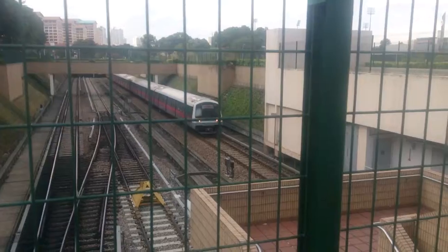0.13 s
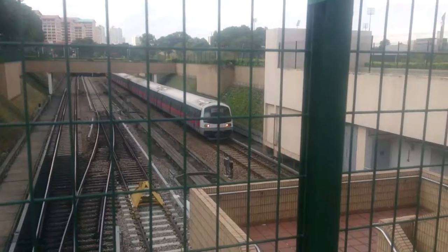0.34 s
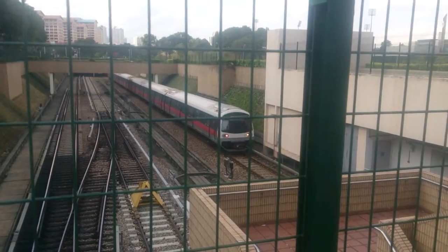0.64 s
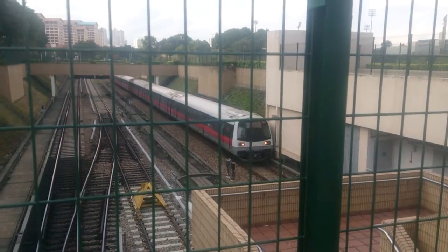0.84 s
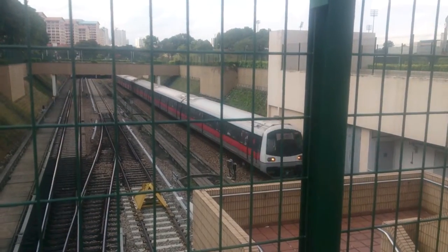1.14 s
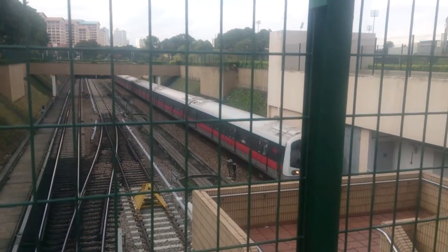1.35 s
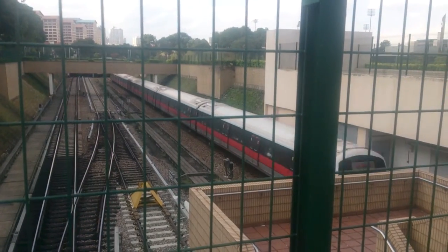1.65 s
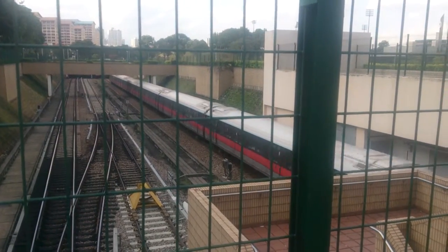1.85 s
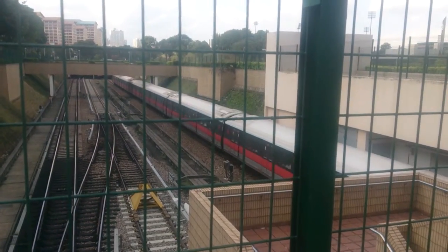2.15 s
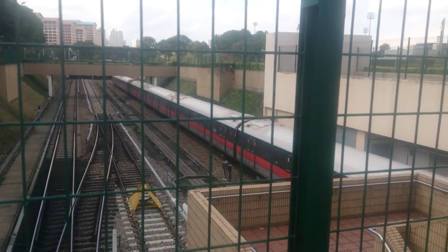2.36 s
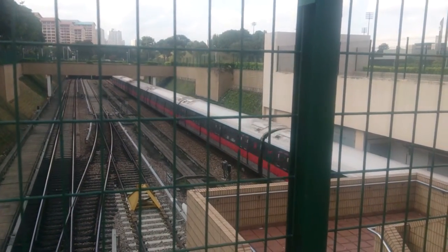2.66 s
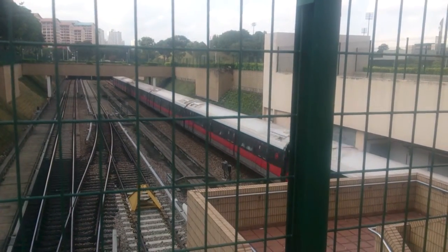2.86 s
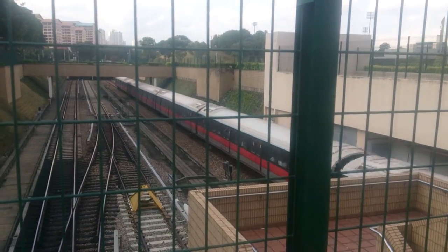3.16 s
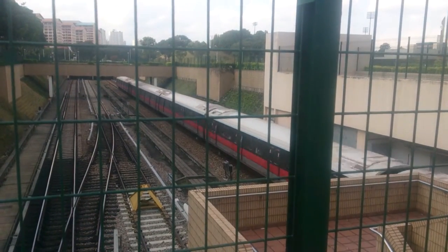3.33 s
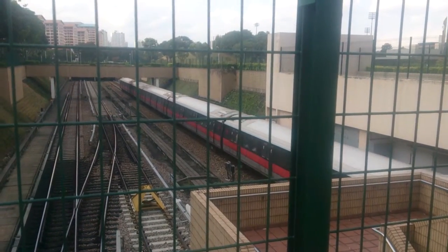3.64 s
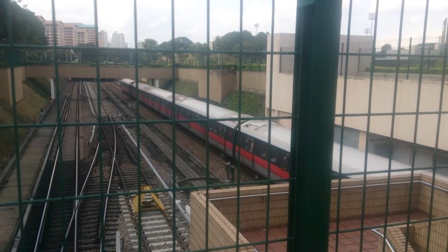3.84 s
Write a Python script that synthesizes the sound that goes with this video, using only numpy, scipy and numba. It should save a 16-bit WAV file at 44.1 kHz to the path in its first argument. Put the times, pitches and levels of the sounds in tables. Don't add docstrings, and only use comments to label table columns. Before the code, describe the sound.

A metro train passes below outdoors. Silence until 0.38 s, then abruptly a full rolling roar, most open around 1 s and slightly duller after 1.55 s. A blurred rail drone sinks and narrows; motor whine is very faint. Axle thumps and deep booms cluster at 0.5-1.55, 1.9-2.9 and 3.4-3.9 s. Faint air hiss peaks near 1.55 s; soft clanks at 2.4, 2.6, 3.5, 3.8. Phone stereo, right brighter; roar continues to the end.

```python
import sys
import numpy as np
from scipy import signal
from scipy.fft import rfft, irfft
from scipy.io import wavfile
from scipy.ndimage import uniform_filter1d
from numba import njit

SR = 44100
rng = np.random.default_rng(int(sys.argv[2]) if len(sys.argv) > 2 else 0)


def ratio(d):
    e = np.asarray(d, float) / 20
    return 10 ** e


def persist_wave(psi):
    counts = np.round(np.clip(psi, -1, 1) * 32767).astype(np.int16)
    wavfile.write(sys.argv[1], SR, np.atleast_2d(counts).T)


N = 176400

# t/s, level/dB
EXPOSURE = [
    (0.39, -46.5),
    (0.95, -45.5),
    (0.96, -44.5),
    (1.52, -45),
    (1.56, -48.5),
    (3.41, -51),
    (3.49, -51),
    (3.51, -51),
    (4.0, -51.5),
]
# f/Hz, share/1
EXPOSURE_SHARE = [(30, 0.46), (70, 1.2), (150, 0.2), (600, 1.02), (2000, 1.43), (5000, 1.12), (12000, 0.33)]
# f/Hz, density/dB per Hz
ROAR_SPECTRUM = [(12, -28), (20, 5), (317, -14), (687, -7.5), (1100, -10), (2130, -15), (5460, -34.5),
                 (7200, -39.5), (14800, -52)]
# f/Hz, width/Hz, level/dB, extra at the left port/dB
WHEEL_RESONANCES = [
    (68, 12, -55, 8.5),
    (528, 225, -50.5, -8),
    (841, 176, -51, 4.5),
    (1910, 790, -51, -10),
    (4390, 630, -60.5, -10),
]
# t/s, f/Hz, level/dB, blur/Hz
RAIL_SONG = [(.38, 781, -50.5, 119.6), (1.0, 769, -40.5, 118), (1.6, 770, -52, 109.3), (2.0, 692, -44, 86),
             (2.45, 706, -46, 78.7), (2.9, 711, -44, 68.3), (3.2, 670, -41, 57.4), (3.6, 659, -45, 58.7),
             (4.0, 654.5, -44, 53.7)]
# t/s, level/dB
BRAKE_AIR = [
    (.39, -60.5),
    (1.35, -61),
    (1.55, -55.5),
    (1.9, -58.5),
    (2.3, -64),
    (3.0, -65),
    (4.0, -69),
]
# t/s, peak level/dB, thud f/Hz
JOINT_BLOWS = [(0.516, -42.5, 271), (0.64, -49, 104), (0.776, -42.5, 124), (0.871, -41, 120),
               (0.956, -35, 142), (0.999, -40.5, 228), (1.111, -36, 114), (1.168, -37, 255),
               (1.243, -37.5, 110.5), (1.401, -35.5, 136), (1.462, -40, 105), (1.54, -50, 102),
               (1.937, -37, 190), (2.099, -35.5, 99), (2.267, -36.5, 107), (2.335, -51, 104.4),
               (2.398, -36, 194), (2.547, -37.5, 228), (2.65, -40.5, 132), (2.853, -39, 137),
               (3.199, -43, 102), (3.439, -34, 184), (3.592, -36, 99), (3.647, -40.5, 130),
               (3.777, -38.5, 101), (3.917, -35.5, 115.4)]
# f/Hz, width/Hz, level/dB, t60/s
JOINT_BODY = [
    (185, 202, -8.5, 0.26),
    (430, 220, -6, 0.37),
    (783, 270, -9.5, 0.27),
    (2570, 1900, -20, 0.63),
    (4970, 2000, -30.5, 0.81),
]
# t/s, peak level/dB, f/Hz
BED_BOOMS = [(.63, -36, 66), (.76, -39, 68), (.83, -38, 68), (.99, -41, 68), (1.06, -37, 70),
             (1.14, -33, 68.6), (1.19, -34.5, 68.9), (1.47, -38, 62.4), (1.525, -32, 61.4), (1.91, -36, 68),
             (2.09, -38, 60.05), (2.42, -39.5, 67), (2.54, -38, 62), (2.585, -39, 65.6), (2.86, -40, 70.4),
             (3.42, -35, 54), (3.46, -38, 60.43), (3.59, -34, 65.85), (3.645, -46, 60), (3.76, -37, 59.9),
             (3.905, -37, 69.6)]
# t/s, level/dB
CLANKS = [
    (2.43, -48),
    (2.63, -49),
    (3.48, -47.5),
    (3.78, -50.5),
]
# f/Hz, left minus right/dB
PORT_BALANCE = [(60, -5.5), (110, -5.0), (200, -5.0), (370, -6.0), (680, -5.0), (1260, -10.0),
                (2310, -13.5), (4240, -9.5), (7790, -10.5), (14300, -6.5)]
# f/Hz, share/1
COMMON_SHARE = [(30, .3), (70, .75), (130, .95), (300, .94), (650, .85), (1000, .4), (2000, .25),
                (14000, .2)]
# f/Hz, left level/dB, right level/dB
DROPOUT_LIMIT = [(5000, -16, -24), (7000, -4, -16), (9000, 1.5, -9), (11000, 1.5, -4), (13000, 1.1, .5),
                 (14200, 3, 4), (14900, 7, 7)]
# t/s, level/dB
DROPOUT_SHIFT = [(.4, -2.1), (1.0, .1), (2.3, .1), (2.8, -1.5), (2.95, -8), (3.12, -8), (3.25, -1.1),
                 (4.0, -1.5)]


def curve(table, axis=1):
    rows = np.array(table)
    return np.interp(np.arange(N) / SR, rows[:, 0], rows[:, axis])


def at(table, hz):
    rows = np.array(table)
    return np.interp(np.log(hz), np.log(rows[:, 0]), rows[:, 1])


@njit
def svf(x, hz, width):
    y, b, l = np.empty(len(x)), 0., 0.
    for i in range(len(x)):
        g, k = np.tan(np.pi * hz[i] / SR), width[i] / hz[i]
        v = (b + g * (x[i] - l)) / (1 + g * (g + k))
        b, l, y[i] = 2 * v - b, l + 2 * g * v, k * v
    return y


def walk(rate):
    hold = int(SR / rate)
    steps = np.repeat(rng.standard_normal(N // hold + 1), hold)
    return 0.8 * uniform_filter1d(uniform_filter1d(steps, hold), hold)[:N]


def band(hz, width_hz):
    hz = np.clip(hz + np.zeros(N), 15, .45 * SR)
    wide = 1.5 * width_hz + np.zeros(N)
    noise = rng.standard_normal((3, N))
    x = np.array([svf(svf(n, hz, wide), hz, wide) for n in noise]) / np.sqrt(wide)
    return x / x.std(axis=1, keepdims=True)


def exposure(hz):
    db = curve(EXPOSURE)
    left_follows = 0.18
    return at(EXPOSURE_SHARE, hz) * (db - db.mean()) * np.array([[1], [left_follows], [1]])


def roar():
    out, swell = 0, walk(4.58)
    for hz in 22 * 2 ** np.arange(0, 9.5, .5):
        db = at(ROAR_SPECTRUM, hz) + 10 * np.log10(hz / 700)
        db = db + exposure(hz) + 0.96 * swell + 2.3 * walk(9)
        out = out + ratio(-40.5 + db) * band(hz, hz / 3)
    for hz, width_hz, db, left_db in WHEEL_RESONANCES:
        level = db + np.array([[0], [left_db], [0]]) + exposure(hz) + 0.49 * walk(5.97)
        wavering_hz = hz * (1 + 0.038 * walk(3.28))
        out = out + ratio(level) * band(wavering_hz, width_hz)
    return out


def rail_song():
    core_db, flicker_db = -9, 2.2
    hz = curve(RAIL_SONG) * (1 + .004 * walk(6))
    blur_hz = curve(RAIL_SONG, axis=3)
    phase = 2 * np.pi * np.cumsum(hz + .4 * blur_hz * walk(40)) / SR
    core = np.sqrt(2) * ratio(core_db) * np.sin(phase)
    song = band(hz, blur_hz) + core * np.array([[1], [0], [0]])
    return ratio(curve(RAIL_SONG, axis=2) + flicker_db * walk(25.075)) * song


def whine():
    order, level_db, width_hz = 8.0, -77, 200
    hz = order * uniform_filter1d(curve(RAIL_SONG), size=SR // 2)
    return ratio(level_db + 4.2 * walk(4.8)) * band(hz, width_hz)[1:]


def air():
    hiss = ratio(curve(BRAKE_AIR) + 2 + 0.37 * walk(9.34)) * band(7164, 1180)
    rasp_s, rasp_length_s, rasp_db = 3.04, 0.13, -70.5
    rasp_shape = np.exp(-((np.arange(N) / SR - rasp_s) / rasp_length_s) ** 4)
    rasp = ratio(rasp_db) * rasp_shape * band(10730, 6000)
    return hiss * ratio([[-6], [-14], [0]]) + rasp


def since_blow(s):
    early_s = .012
    return np.arange(N) / SR + early_s - s


def blow_shape(s, t60):
    rise_s, since = .022, since_blow(s)
    return np.clip(since / rise_s, 0, 1) * ratio(-60 * np.clip(since - rise_s, 0, 2) / t60)


def thumps(blows, level_db, t60):
    out = np.zeros(N)
    for s, db, hz in blows:
        out += ratio(db + level_db) * blow_shape(s, t60) * np.sin(2 * np.pi * hz * since_blow(s))
    return out


def joints():
    out = np.zeros((3, N))
    out[0] = thumps(JOINT_BLOWS, level_db=-6, t60=0.13)
    for hz, width_hz, body_db, t60 in JOINT_BODY:
        shake = sum(ratio(db + body_db) * blow_shape(s, t60) for s, db, _ in JOINT_BLOWS)
        out += band(hz, width_hz) * shake
    return out * ratio([[0], [7], [0]])


def bed_booms():
    return thumps(BED_BOOMS, level_db=-2.1, t60=.3) * np.array([[1], [0], [0]])


def clanks():
    t60, rise_s, env = 0.21, .01, 0
    for s, db in CLANKS:
        since = np.arange(N) / SR - s
        rise = np.clip((since + rise_s) / rise_s, 0, 1)
        env = env + ratio(db - 60 * np.clip(since, 0, 2) / t60) * rise
    return env * band(2300, 1160)


def scene():
    left_lead_s = .00024
    parts = rfft(roar() + rail_song() + air() + joints() + bed_booms() + clanks(), axis=1)
    hz = np.arange(parts.shape[1]) * SR / N + 1
    share = np.clip(at(COMMON_SHARE, hz), 0, 1)
    common = np.sqrt(share) * parts[0]
    left = common * np.exp(2j * np.pi * hz * left_lead_s) + np.sqrt(1 - share) * parts[1]
    right = common + np.sqrt(1 - share) * parts[2]
    ports = np.array([left * ratio(at(PORT_BALANCE, hz)), right])
    return irfft(ports, N, axis=1) * ratio(3.0) + whine()


def thin_treble(x):
    scatter_db = 5
    hz, t, z = signal.stft(x, SR, nperseg=2048)
    power = abs(z) ** 2
    patch = power[:, :1024].reshape(2, 128, 8, -1).mean(axis=2)
    luck = np.repeat(rng.standard_normal((2, 128, len(t))), 2, axis=2)[:, :, :len(t)]
    patch = uniform_filter1d(patch, size=2, axis=2) * ratio(scatter_db * luck) ** 2
    patch = np.repeat(patch, 8, axis=1)
    patch = np.concatenate([patch, patch[:, -1:]], axis=1)
    local = uniform_filter1d(uniform_filter1d(power, size=60, axis=1), size=5, axis=2)
    table, shift = np.array(DROPOUT_LIMIT), np.array(DROPOUT_SHIFT)
    limit = np.array([np.interp(hz, table[:, 0], table[:, port], left=-99) for port in (1, 2)])
    limit = limit[:, :, None] + np.interp(t, shift[:, 0], shift[:, 1])
    keep = patch > local * ratio(limit) ** 2
    return signal.istft(z * keep, SR, nperseg=2048)[1][:, :N]


def roll_off(x):
    return signal.sosfilt(signal.butter(12, 14910, fs=SR, output="sos"), x)


def record(dry):
    start_s, open_s = .3829, .0004
    gate = np.clip((np.arange(N) / SR - start_s) / open_s, 0, 1)
    mix = thin_treble(dry) * gate
    return roll_off(mix)


dry = scene()
out = record(dry)
persist_wave(out)
```